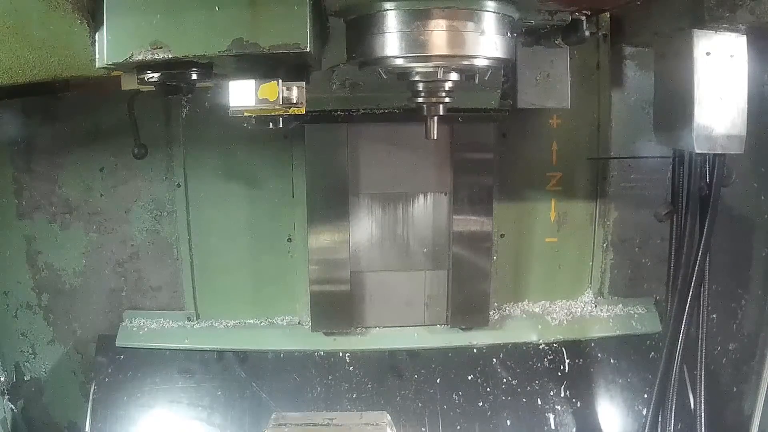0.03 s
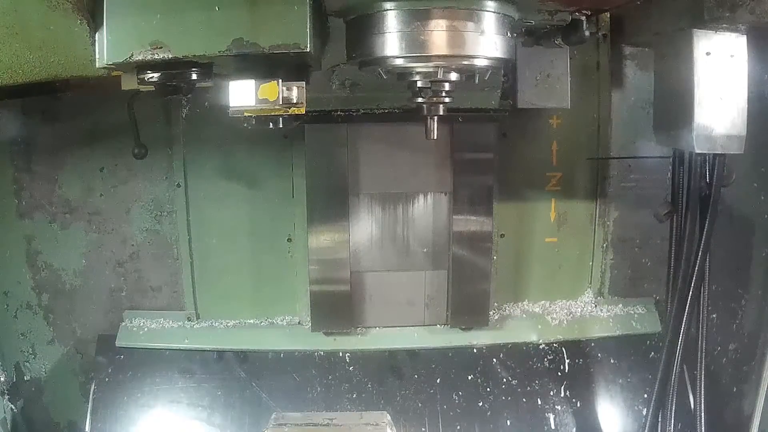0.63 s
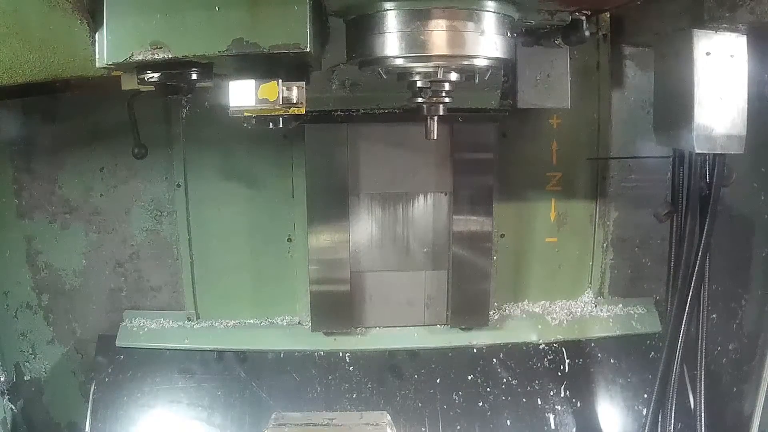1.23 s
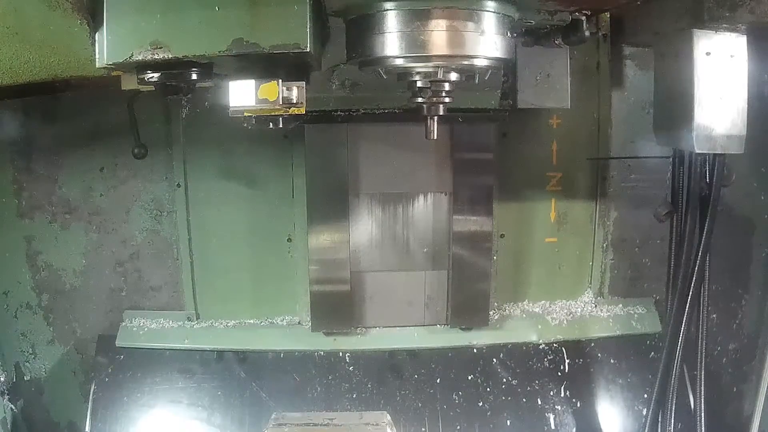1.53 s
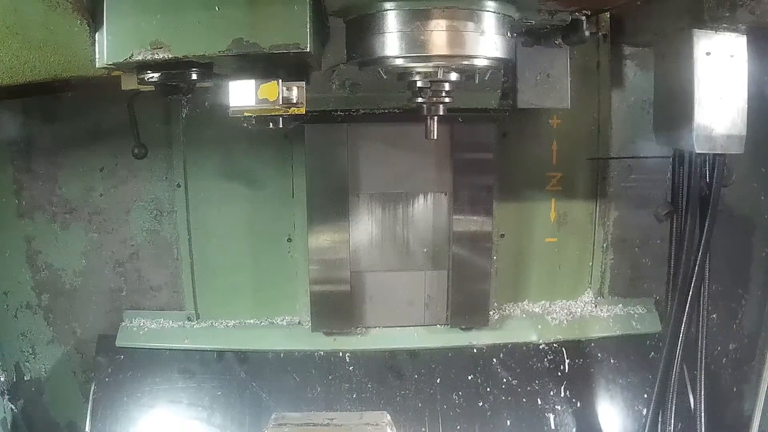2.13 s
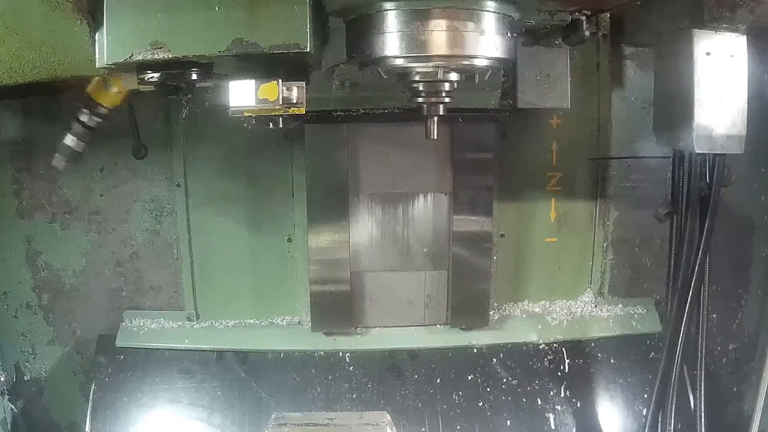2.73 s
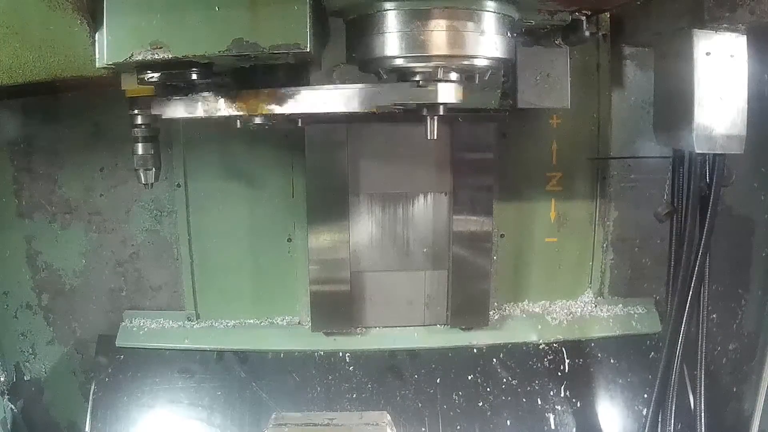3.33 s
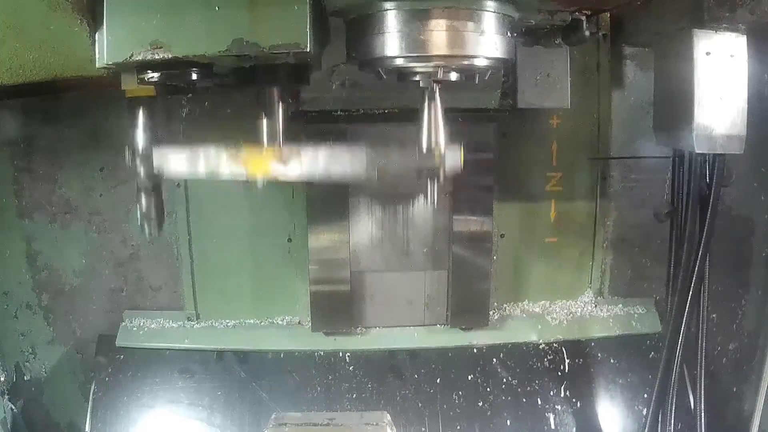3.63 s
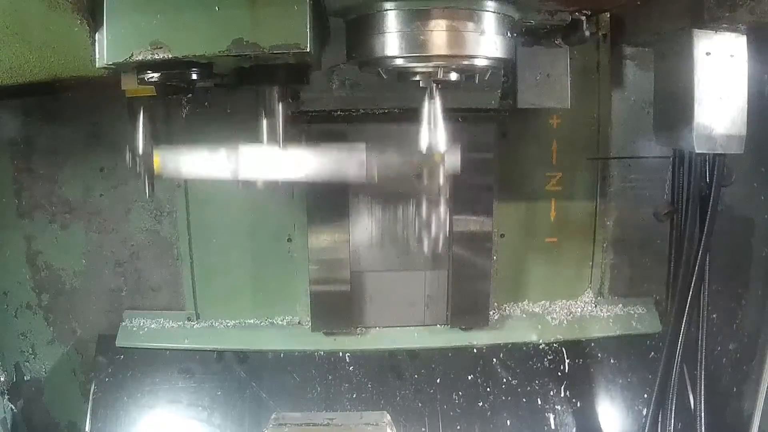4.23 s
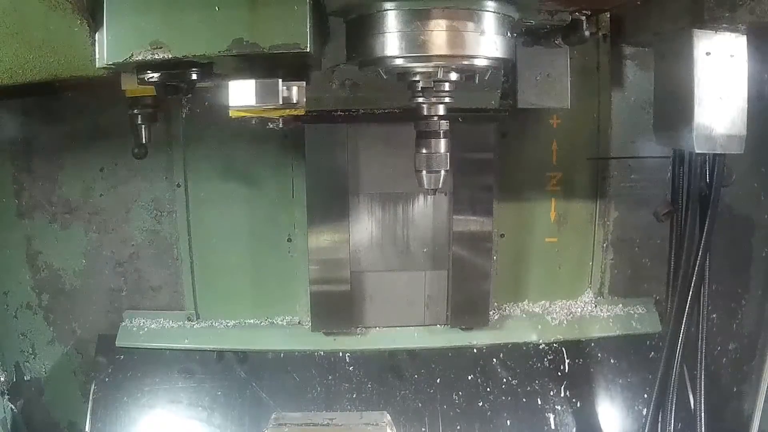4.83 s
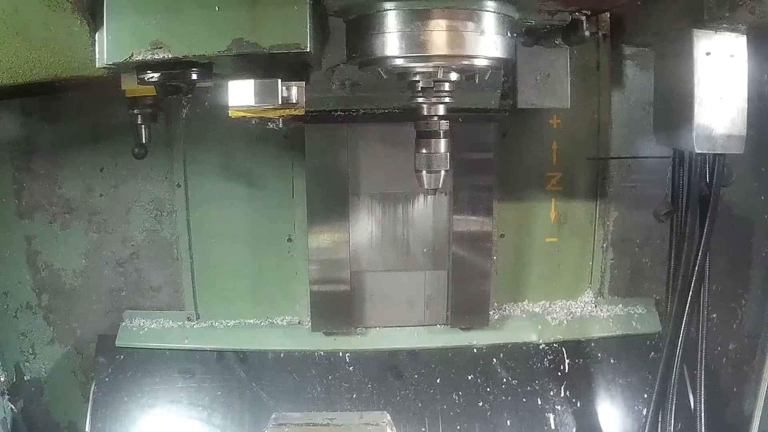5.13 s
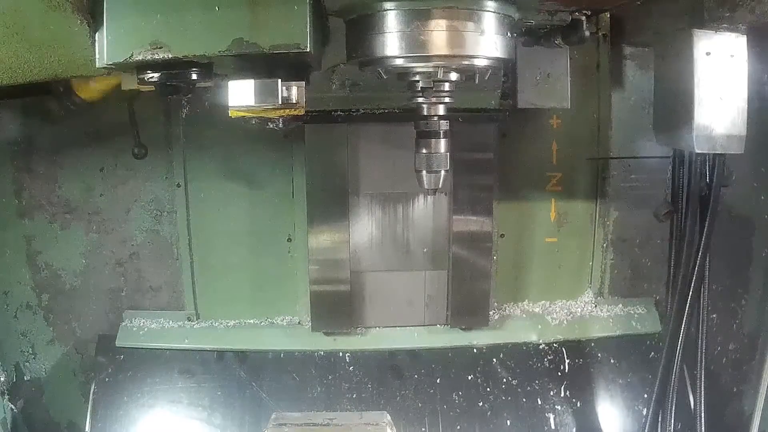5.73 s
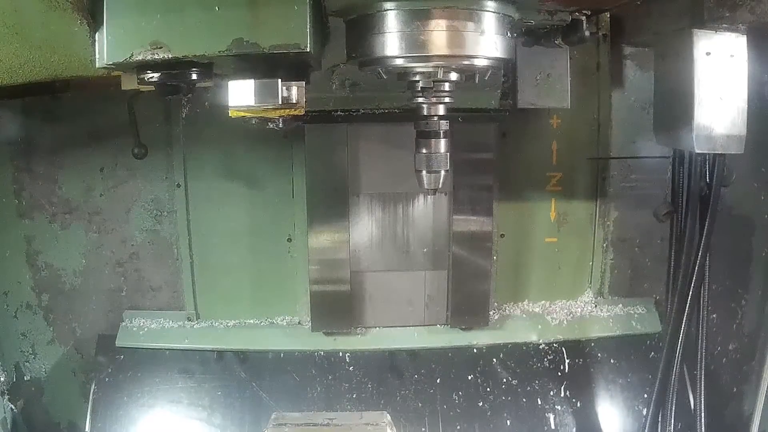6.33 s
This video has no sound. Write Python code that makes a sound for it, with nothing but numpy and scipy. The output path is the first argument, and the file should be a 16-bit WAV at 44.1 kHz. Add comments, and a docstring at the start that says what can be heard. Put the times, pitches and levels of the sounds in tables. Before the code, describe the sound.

A machine tool hums, then swaps its cutter with whirring gears, metal clunks and a loud hissing blast of compressed air.

```python
"""A machine tool swaps its cutter

Inside a sheet-steel enclosure, pumps and fans hum and a servo drive whines. Gears rumble as
a tool pot (the cup holding the next tool) swings down and an arm grips both tools with a clunk.
Air blasts through the spindle's cone-shaped socket until the new tool slides in and chokes it.
The drawbar (a clamping rod) locks the tool, the arm parks and the pot swings back up."""
import sys
import numpy as np
from scipy import signal
from scipy.fft import rfft, irfft, next_fast_len
from scipy.io import wavfile
from scipy.ndimage import uniform_filter1d, map_coordinates

SR = 44100
rng = np.random.default_rng(int(sys.argv[2]) if len(sys.argv) > 2 else 0)


def master_out(mix):
    """Clip the mix to full scale and print it as 16-bit PCM to the path in sys.argv[1]."""
    frames = np.transpose(np.atleast_2d(mix))
    ceiling = np.clip(frames, -1, 1)
    pcm = np.round(ceiling * 32767).astype(np.int16)
    wavfile.write(sys.argv[1], SR, pcm)


N = 290178
TIME = np.arange(N) / SR


def amp(db):
    """Turn decibels into a gain."""
    return 10 ** (np.asarray(db) / 20)


def unit(x):
    """Scale a sound to an average (rms) level of 1."""
    return x / np.sqrt(np.mean(x ** 2) + 1e-20)


def wobble(rate):
    """A smooth curve through `rate` random points a second."""
    return map_coordinates(rng.standard_normal(int(N * rate / SR) + 4), [TIME * rate])


def filtered(x, response):
    """Scale each frequency of a sound by response(hz)."""
    size = next_fast_len(N + SR // 2)
    return irfft(rfft(x, size) * response(np.fft.rfftfreq(size, 1 / SR)), size)[:N]


def noise(spectrum=(), modes=()):
    """Noise with a broad shape (spectrum) and ringing peaks (modes)."""
    def response(hz):
        power = np.zeros_like(hz)
        if len(spectrum):
            points_hz, db = np.transpose(spectrum)
            power += amp(np.interp(np.log(hz + 1), np.log(points_hz), db)) ** 2
        for centre, width, db in modes:
            power += (amp(db) / (1 + ((hz - centre) / width) ** 2)) ** 2
        return np.sqrt(power)
    return unit(filtered(rng.standard_normal(N), response))


def tone(hz, drift_hz, rate):
    """A pure tone whose pitch wanders."""
    turns = np.cumsum(hz + drift_hz * wobble(rate)) / SR + rng.random()
    return np.sqrt(2) * np.sin(2 * np.pi * turns)


def burst(start, attack, hold, t60):
    """A loudness curve that jumps up, holds, then fades by 60 dB in t60 seconds."""
    age = np.maximum(TIME - start, 0)
    return (1 - np.exp(-age / attack)) * amp(-60 * np.maximum(age - hold, 0) / t60)


def gate(start, rise, stop, t60):
    """A loudness curve that ramps up, holds until stop, then fades."""
    return np.clip((TIME - start) / rise, 0, 1) * amp(-60 * np.maximum(TIME - stop, 0) / t60)


def enclosed(x, t60, echo_db):
    """Echoes between the steel walls colour a steady sound."""
    t = np.arange(SR // 2) / SR
    tail = rng.standard_normal(len(t)) * amp(-60 * t / t60)
    echoes = signal.fftconvolve(x, tail / np.linalg.norm(tail))[:N]
    return unit(x + amp(echo_db) * echoes)


def cushioned(x, cutoff_hz):
    """A softer contact has a lower cutoff, so it sounds duller."""
    return filtered(x, lambda hz: 1 / (1 + 1j * np.sqrt(2) * hz / cutoff_hz - (hz / cutoff_hz) ** 2))


# Tones of the pumps and fans (pitch [Hz], level [dB])
HUM_TONES = [(198.4, -73.5), (199.7, -68.5), (214.6, -61), (222.6, -74), (299.3, -77.5), (593.5, -87),
             (642.8, -80.5), (1197, -84), (1286, -82.5), (1385, -80.5), (1621, -88), (1705, -82),
             (1925, -83), (2907, -86), (3116, -83), (3741, -86.5)]
# The rush of the fans (frequency [Hz], relative level [dB])
FAN_SPECTRUM = [(20, -7), (60, -1), (160, -0.5), (330, -3.5), (600, -8.5), (800, -12.5), (1080, -15.5),
                (1500, -14), (2200, -10.5), (2700, -17), (3400, -13), (4500, -18.5), (8000, -21.5),
                (15000, -21.5)]
# Where the machine's casing rings (pitch [Hz], width [Hz], relative level [dB])
CASING_MODES = [(1390, 78, -6), (1624, 44, -6.5), (1912, 73, -4.5), (3013, 34, -3.5), (3144, 90, -7),
                (3840, 56, -15), (5830, 63, -13.5)]


def pumps_and_fans():
    """Pump tones close in pitch throb against each other over the rush of fans."""
    hum = sum(amp(db) * tone(hz, drift_hz=0.00094 * hz, rate=6) for hz, db in HUM_TONES)
    fans = enclosed(noise(FAN_SPECTRUM, CASING_MODES), t60=0.28, echo_db=-9.5)
    return hum + amp(-63.5) * fans


# Motor runs: tool magazine, arm starting, arm swinging, magazine again
# (start [s], run-up [s], stop [s], level [dB])
MOTOR_RUNS = [(2.37, 0.088, 4.95, -64.5), (2.96, 0.087, 3.2, -62), (3.21, .15, 4.48, -53),
              (5.68, 0.08, 6.58, -66)]


def motor_effort():
    """How hard the motors work together, as each speeds up, holds and coasts."""
    runs = [amp(db) * gate(start, rise, stop, t60=1.35) for start, rise, stop, db in MOTOR_RUNS]
    return np.sqrt(sum(run ** 2 for run in runs))


# Hiss around the drive's whine (pitch [Hz], width [Hz], relative level [dB])
HISS_BANDS = [(11750, 300, 5), (13120, 220, 0), (9850, 150, -2)]


def servo_drive():
    """The drive's switching whines and hisses, up to 6 dB louder when the motors work."""
    flips = np.tanh(5 * np.sin(2 * np.pi * 45.6 * TIME))  # the tone flips sign 91 times a second
    whine = amp(-76.5) * flips * tone(11905, drift_hz=1.5, rate=20)
    cycle = (TIME - 0.18) % 1  # the hiss swells once a second
    swell = uniform_filter1d(1.0 * (cycle < 0.33), SR // 50)
    buzz = np.cos(2 * np.pi * 91.2 * TIME)
    hiss = amp(-88 + swell * (10 + 4 * buzz)) * noise(modes=HISS_BANDS)
    effort = motor_effort()
    return amp(6 * np.sqrt(effort / effort.max())) * (whine + hiss)


# The hiss of a small valve (pitch [Hz], width [Hz], relative level [dB])
VALVE_BANDS = [(5700, 260, 0.5), (10200, 430, -4), (10750, 450, -6)]


def valve_spit():
    """A valve spits a little air before the pot swings back."""
    return amp(-61) * burst(5.33, attack=0.0056, hold=0.022, t60=0.48) * noise(modes=VALVE_BANDS)


def drive_chirp():
    """A thin, short electrical chirp from the drive."""
    loudness = amp(-54) * burst(4.326, attack=0.001, hold=0.048, t60=0.012)
    return loudness * tone(12166, drift_hz=3, rate=40)


# The noise of the gears (frequency [Hz], relative level [dB])
GEAR_SPECTRUM = [(25, -6), (80, -5), (190, 5), (300, -11), (560, -4), (1000, -15), (1500, -12),
                 (2100, -11.5), (2650, -18), (3400, -15), (4500, -23), (8000, -29.5), (15000, -30)]


def gears():
    """The gears grind unevenly, louder as the motors work harder."""
    unevenness = amp(1.4 * wobble(28))
    grind = enclosed(noise(GEAR_SPECTRUM, CASING_MODES), t60=0.24, echo_db=-3)
    return motor_effort() * unevenness * grind


# Jolts of the moving parts (start [s], level [dB], fade time [s])
PART_JOLTS = [(2.61, -63.5, 2.5), (2.75, -58.5, 1.4), (2.97, -49.5, .5), (3.28, -43.5, 0.45),
              (3.47, -32.6, 2.4), (4.14, -50, .4), (4.31, -38.5, 0.37), (4.54, -52.5, 2), (5.82, -54, 3.2)]


def enclosure_boom():
    """Jolts make the enclosed air boom at its lowest note, over a rumble that follows the motors."""
    boom_hz = 47.7
    jolts = [amp(db) * gate(start, rise=0.075, stop=start + 0.1, t60=t60)
             for start, db, t60 in PART_JOLTS]
    shake = np.sqrt(sum(jolt ** 2 for jolt in jolts))
    boom = shake * tone(boom_hz, drift_hz=0.64, rate=14)
    rumble = (amp(-74) + amp(-8) * motor_effort()) * noise(modes=[(boom_hz, 6, 0)])
    return boom + rumble


# The notes of the steel arm (pitch [Hz], relative level [dB])
ARM_MODES = [(980, -14), (1254, -1.5), (1384, 0.5), (1455, -0.5), (1640, -13), (1870, -2), (1930, -9)]


def arm_ring(start):
    """The arm's notes sound for half a second, blurred by echoes."""
    hz, db = np.transpose(ARM_MODES)
    t = np.arange(SR // 2) / SR
    steps = rng.standard_normal((len(hz), len(t)))
    blur = 0.93 * np.cumsum(steps, axis=1) / np.sqrt(SR / 100)
    phase = 2 * np.pi * (hz[:, None] * t + rng.random((len(hz), 1))) + blur
    ring = unit(amp(db) @ np.sin(phase))
    return np.pad(ring, (round(start * SR), N))[:N]


# Where the sheet-steel panels ring (pitch [Hz], width [Hz], relative level [dB])
PANEL_MODES = [(506, 44, -0.5), (630, 54, 0.5), (980, 33, -14.5), (1190, 40, -4.5), (1370, 63, -1.5),
               (1766, 60, 1), (1927, 89, -1), (3090, 130, -5.5)]
# Blows of pot, arm and drawbar (time [s], thud level [dB], clunk level [dB], cutoff [Hz])
BLOWS = [(2.962, -56, -50.5, 2800), (3.227, -47.5, -44, 12000), (3.284, -36, -40, 3720),
         (3.351, -41, -48.5, 2000), (3.41, -42.5, -51, 2000), (3.508, -41, -53, 2000),
         (4.298, -44, -45.5, 5500), (4.349, -42, -54, 2200), (4.436, -47, -48.5, 3700),
         (4.511, -54.5, -57.5, 11000), (4.677, -53, -51.5, 1270), (4.704, -55, -47, 1090),
         (4.775, -48, -62, 1000), (5.825, -59, -59, 2000), (5.92, -53, -72, 1000)]


def knocks():
    """Each blow thuds in the frame, clunks in the panels and, the harder it is, rings the arm."""
    # The panels' broad rattle (frequency [Hz], relative level [dB])
    rattle = [(60, -9), (150, -2.5), (320, -11.5), (600, -15), (2200, -12.5), (4500, -21.5), (12000, -20)]
    out = np.zeros(N)
    for start, thud_db, clunk_db, cutoff_hz in BLOWS:
        frame = tone(204, drift_hz=9.02, rate=60) + amp(-11) * tone(85, drift_hz=17.7, rate=60)
        panels = noise(rattle, PANEL_MODES)
        clank_db = clunk_db + 8 * np.log2(cutoff_hz / 5700)  # 8 dB more each time the cutoff doubles
        thud = amp(thud_db) * burst(start, attack=0.0083, hold=0.019, t60=0.33) * frame
        clunk = amp(clunk_db) * burst(start, attack=0.0011, hold=0.028, t60=0.27) * panels
        clank = amp(clank_db) * burst(start, attack=0.004, hold=0.024, t60=0.21) * arm_ring(start)
        out += cushioned(thud + clunk + clank, cutoff_hz)
    return out


# The snap of steel on steel (frequency [Hz], relative level [dB])
SNAP_SPECTRUM = [(600, -42), (1500, -6.5), (2600, -13.5), (3800, -4), (5000, -6.5), (5800, -8.5),
                 (7200, -9.5), (8500, -16.5), (10500, -18), (13000, -24), (15500, -34)]
# Where the spindle and tool holder ring (pitch [Hz], width [Hz], relative level [dB])
HOLDER_MODES = [(1930, 40, 11.5), (2950, 36, 2.5), (3300, 68, -2), (3790, 180, -1), (4560, 27, 7),
                (5600, 100, 0.5), (5890, 100, 3), (7120, 40, 3), (10700, 100, -4)]
# Latches and grippers snapping shut (time [s], level [dB], cutoff [Hz])
LATCH_SNAPS = [(2.961, -47, 2190), (3.226, -50.5, 10000), (4.294, -47.5, 8000), (4.511, -38.5, 13600)]


def latches():
    """Steel snaps on steel and rings the spindle and tool holder."""
    out = np.zeros(N)
    for start, db, cutoff_hz in LATCH_SNAPS:
        loudness = amp(db) * burst(start, attack=0.00047, hold=0.02, t60=0.2)
        out += cushioned(loudness * noise(SNAP_SPECTRUM, HOLDER_MODES), cutoff_hz)
    return out


# When the air turns on, the new tool enters the socket, and it is fully in
AIR_ON_S, ENTER_S, SEATED_S = 3.43, 4.125, 4.2
# Where the gap around the new tool rings (pitch [Hz], width [Hz], relative level [dB])
GAP_MODES = [(625, 50, -3.5), (1650, 44, -10.5), (2510, 55, -4.5), (2995, 83, -2), (3120, 65, 2),
             (4630, 30, -12), (5710, 170, -11), (7200, 99, -22), (9180, 88, -17.5)]


def closing_gap():
    """Air squeals through the shrinking gap around the tool, and the last of it pops out."""
    squeal = amp(-28) * gate(ENTER_S, SEATED_S - ENTER_S, SEATED_S, t60=0.37) * noise(modes=GAP_MODES)
    pop = amp(-26) * burst(SEATED_S, attack=0.002, hold=0.0052, t60=0.036) * noise(modes=GAP_MODES)
    return squeal + pop


# The bright first blast of air (frequency [Hz], relative level [dB])
BLAST_SPECTRUM = [(150, -37), (500, -10.5), (1000, -26), (2000, -10.5), (3200, 1.5), (4600, 0.5),
                  (5800, 1.5), (7200, -1.5), (9600, -2), (10200, 8), (11300, -1), (12700, -3.5),
                  (14600, -0.5), (15500, -13)]
# The steady blowing that follows (frequency [Hz], relative level [dB])
FLOW_SPECTRUM = [(100, -54), (350, -31), (520, -9.5), (850, -10.5), (1050, -13.5), (1280, -0.5),
                 (2750, -11), (3600, -3.5), (4650, -9), (5500, -2), (6500, -9), (9500, -13.5), (13800, -23),
                 (15200, -33.5)]
# Where the hollows in the spindle's tip ring (pitch [Hz], width [Hz], relative level [dB])
HOLLOW_MODES = [(799, 41, 1.5), (1380, 26, -5), (1847, 94, 2), (1974, 62, 2.5), (2280, 38, 1),
                (2395, 68, 4), (2560, 49, 2), (3040, 135, -1.5), (3420, 65, -3), (3900, 150, -4),
                (4090, 50, -5.5), (4370, 77, -3.5), (5080, 24, -5), (5200, 64, -1), (5880, 110, 0),
                (7140, 70, -11), (7620, 350, -9), (10170, 300, -7.5), (10900, 560, -13.5)]


def air_jet():
    """Air blasts out as the old tool drops, then blows and whistles until the new one chokes it."""
    blast_end = AIR_ON_S + 0.097
    age = np.maximum(TIME - AIR_ON_S, 0)
    extra_pressure = amp(8 * np.exp(-age / 0.13))  # drains quickly from the air line
    flow = amp(-33.5) * extra_pressure * gate(AIR_ON_S, rise=0.12, stop=SEATED_S, t60=0.38)
    blast = amp(-22.5) * gate(AIR_ON_S, rise=0.076, stop=blast_end, t60=0.24)
    lingering = amp(-27) * flow  # a little of the bright hiss stays on
    hiss = (blast + lingering) * enclosed(noise(BLAST_SPECTRUM), t60=0.3, echo_db=0.5)
    waver = amp(0.133 * wobble(24.9))
    rush = flow * waver * enclosed(noise(FLOW_SPECTRUM, HOLLOW_MODES), t60=0.19, echo_db=-2)
    # The nozzle whistles only while the socket is open.
    socket_open = gate(blast_end, rise=0.07, stop=ENTER_S + 0.035, t60=0.25)
    flutter = amp(2.5 * wobble(45))
    whistle = amp(-18) * flow * socket_open * flutter * tone(14660, drift_hz=20, rate=150)
    return hiss + rush + whistle


def scene():
    """Add the idling machine, its moving parts and the air into one channel."""
    background = pumps_and_fans() + servo_drive()
    movement = gears() + enclosure_boom() + drive_chirp() + knocks() + latches()
    air = air_jet() + closing_gap() + valve_spit()
    return (background + movement + air)[None]


def record(dry):
    """Cut away the very highest treble."""
    return filtered(dry[0], lambda hz: hz < 15550)[None]


dry = scene()
out = record(dry)
master_out(out)
```